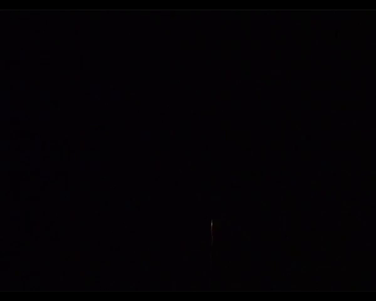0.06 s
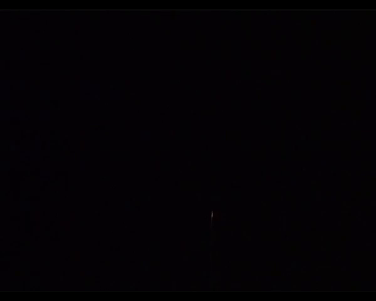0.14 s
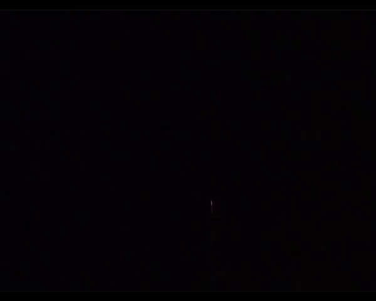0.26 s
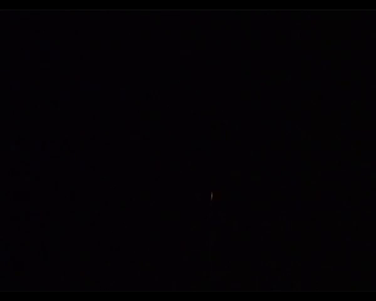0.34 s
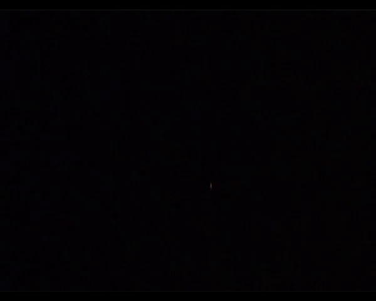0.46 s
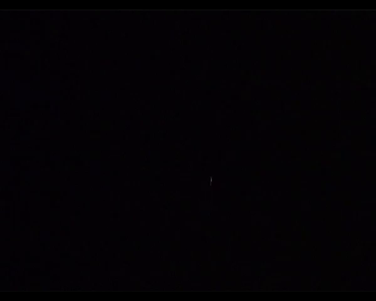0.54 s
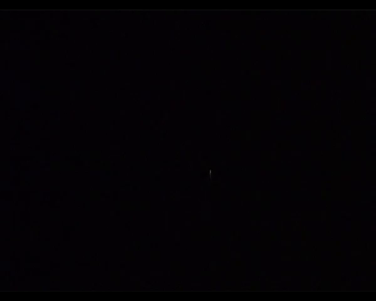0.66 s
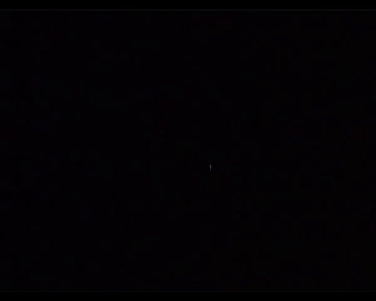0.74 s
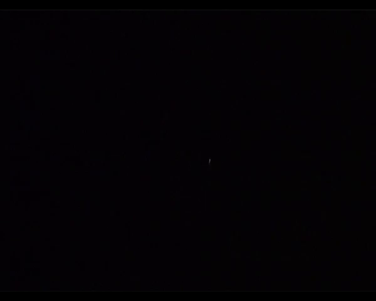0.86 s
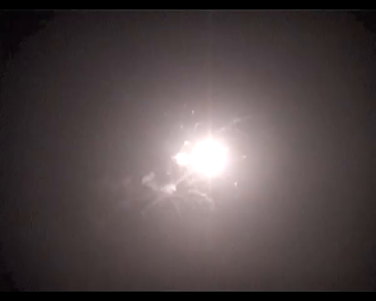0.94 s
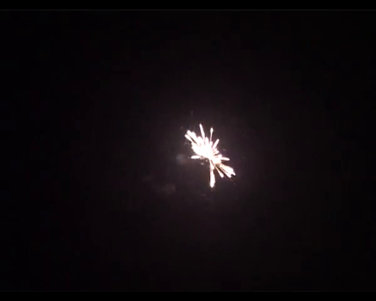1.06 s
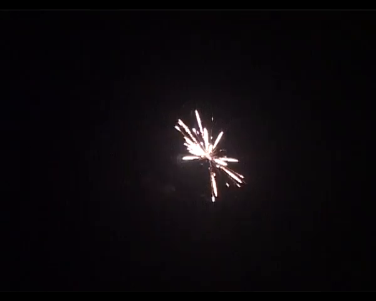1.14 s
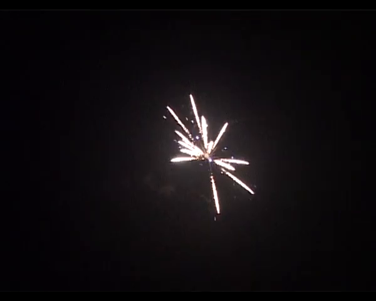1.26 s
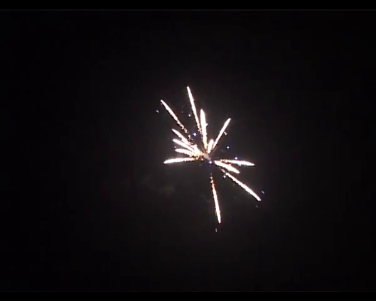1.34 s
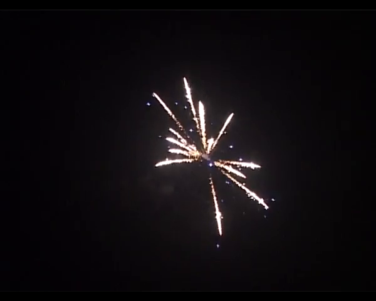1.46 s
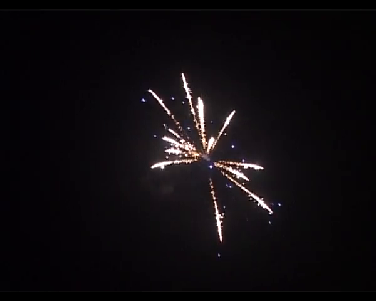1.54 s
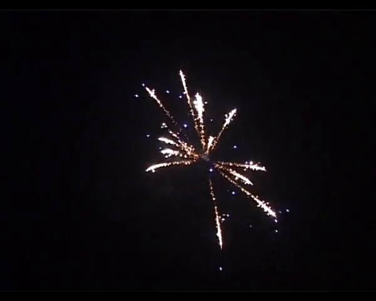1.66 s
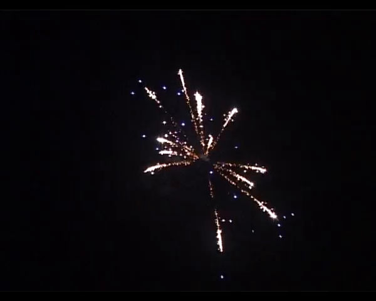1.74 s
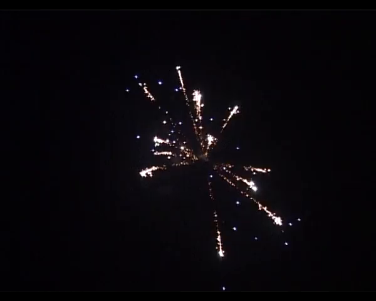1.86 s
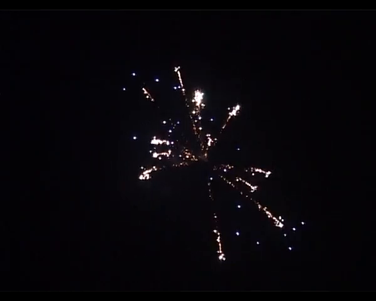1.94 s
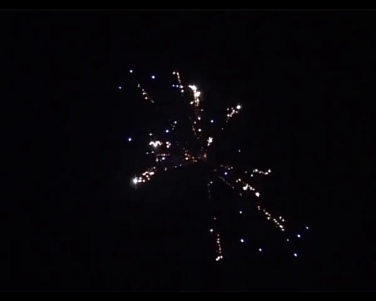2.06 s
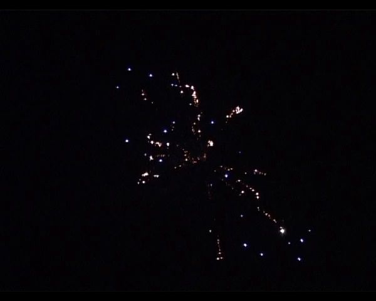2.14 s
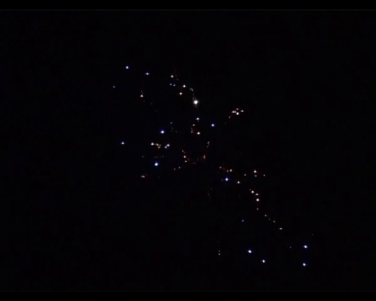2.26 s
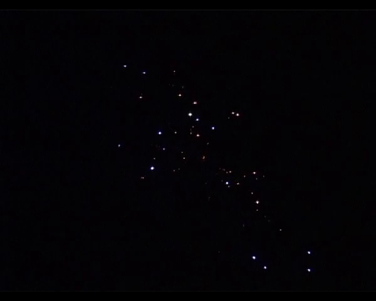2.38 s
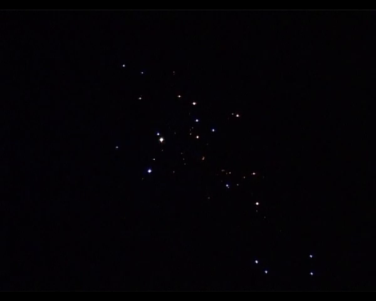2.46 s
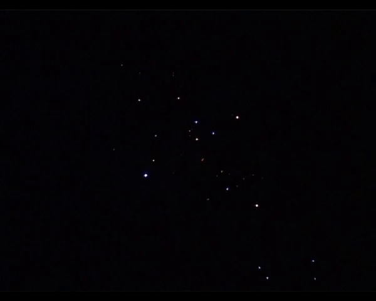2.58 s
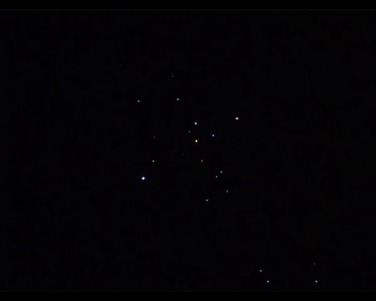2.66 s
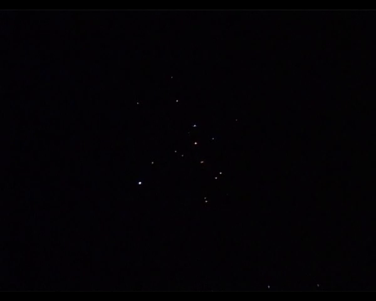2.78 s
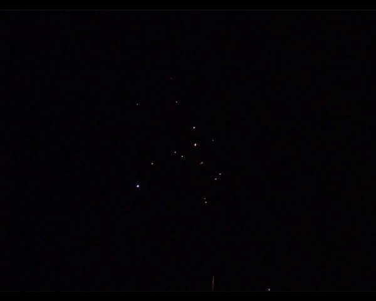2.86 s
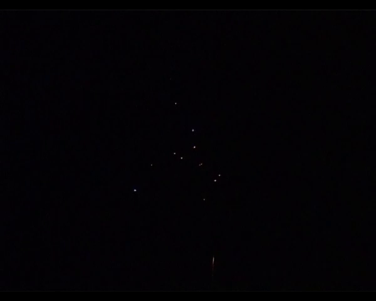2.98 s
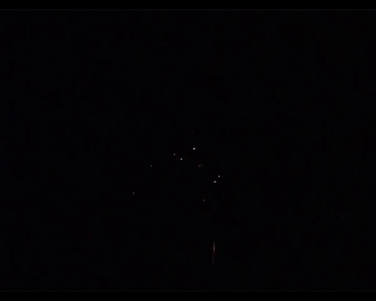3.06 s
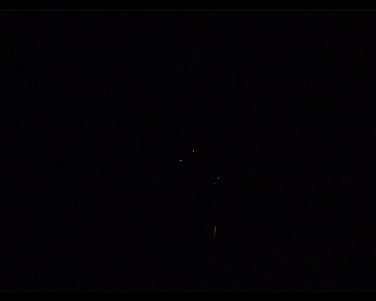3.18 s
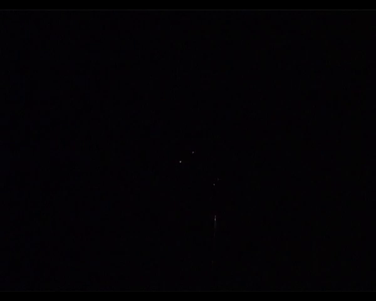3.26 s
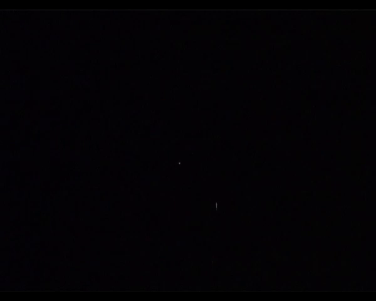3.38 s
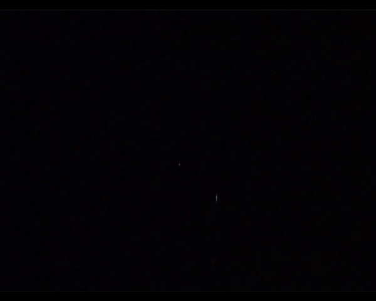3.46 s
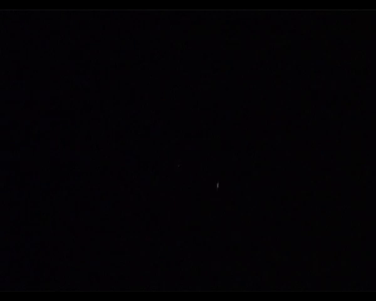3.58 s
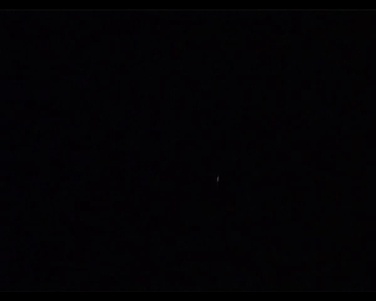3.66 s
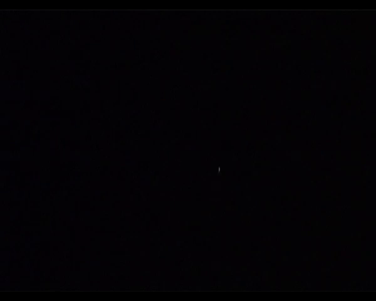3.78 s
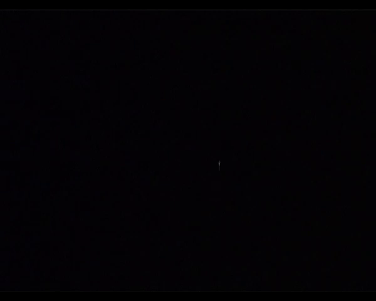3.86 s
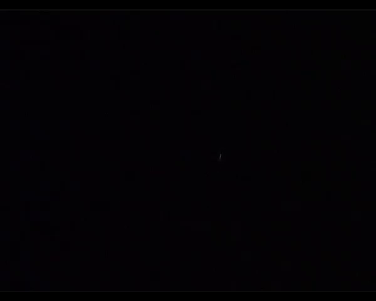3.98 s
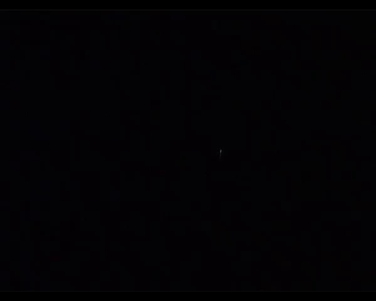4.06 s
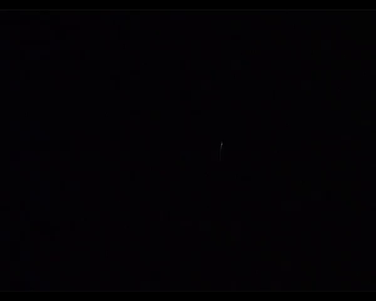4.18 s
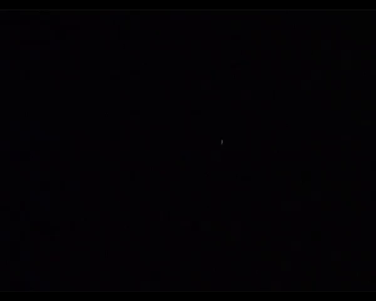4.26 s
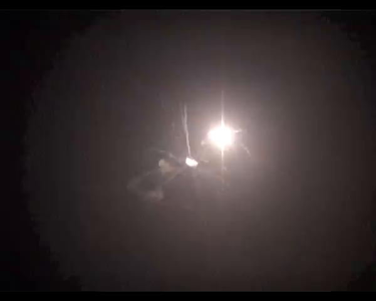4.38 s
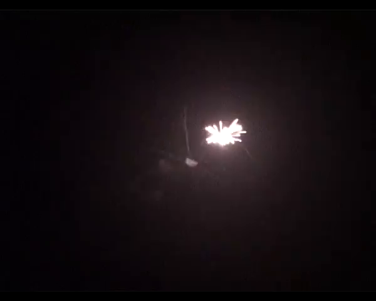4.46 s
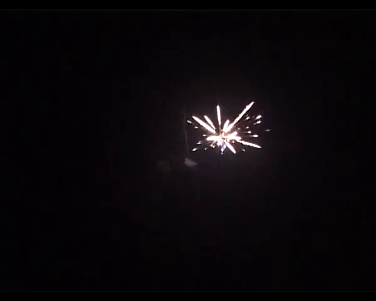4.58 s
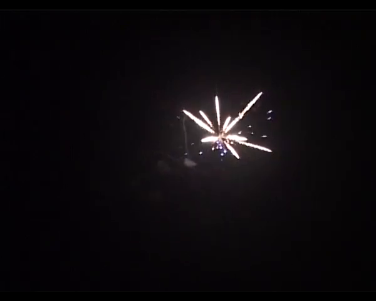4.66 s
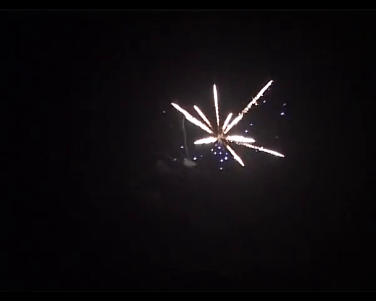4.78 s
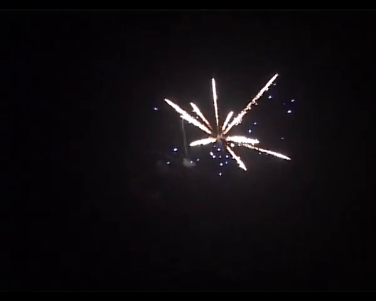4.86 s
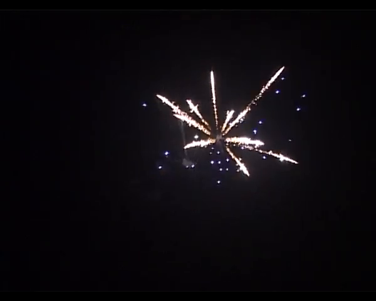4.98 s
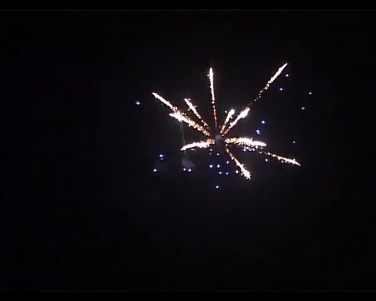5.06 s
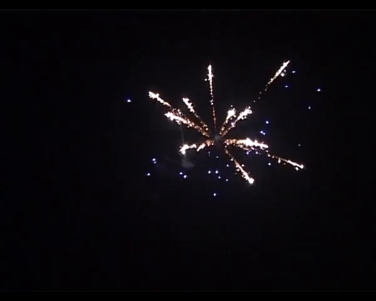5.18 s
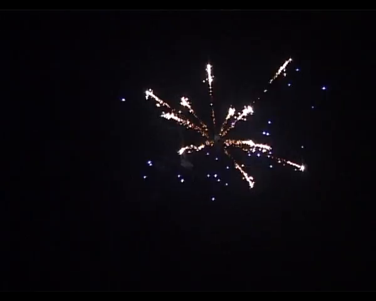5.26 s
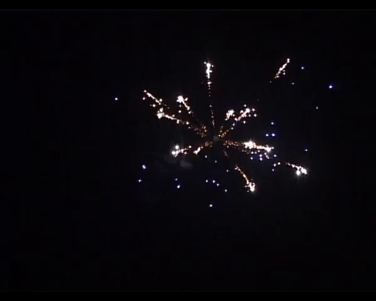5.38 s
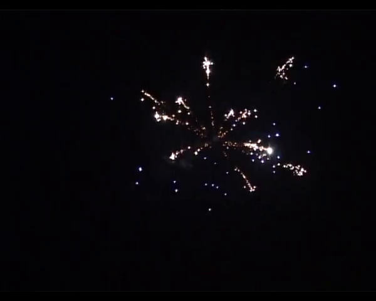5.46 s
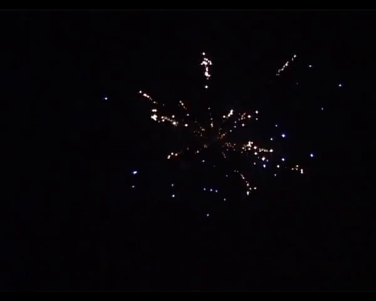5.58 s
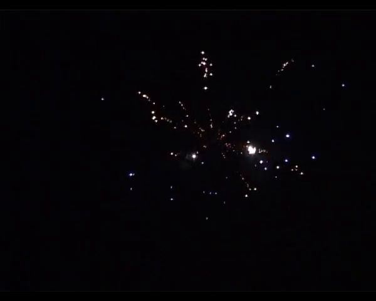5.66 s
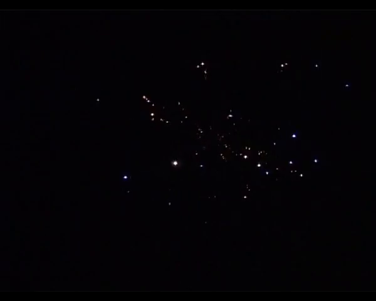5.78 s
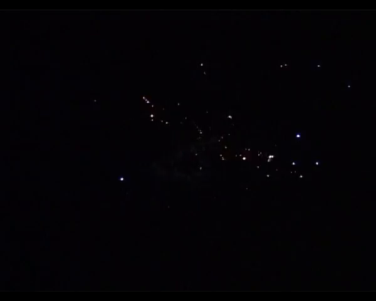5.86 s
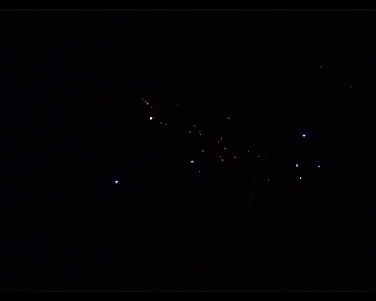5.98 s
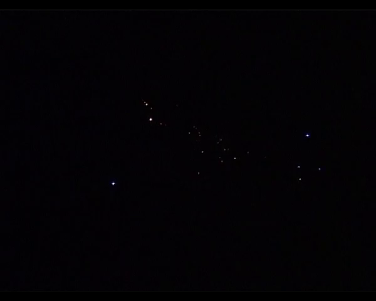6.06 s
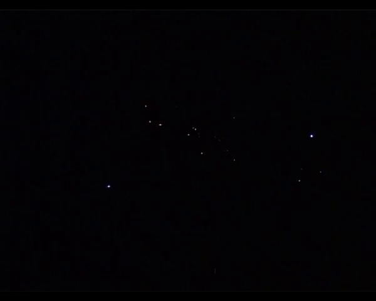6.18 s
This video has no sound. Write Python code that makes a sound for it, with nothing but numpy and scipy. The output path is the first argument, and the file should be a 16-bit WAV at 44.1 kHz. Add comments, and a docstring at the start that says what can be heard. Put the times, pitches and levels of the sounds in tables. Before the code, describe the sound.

Outdoors at night, a faint sputtering hiss climbs, then a huge firework bang cracks and rolls across the land. Half a second later its stars crackle densely and thin out to lone snaps. A launch thump slaps back, another shell hisses upward, and the bang and crackle repeat before a last launch. Quiet crickets, bat chirps and distant thuds fill the gaps. Stereo microphones stand fairly close and overload on the loud shocks.

```python
"""Outdoors at night, a firework cake fires: shells thump out of their tubes, climb and burst into crackling stars.
Shock waves are N-shaped pressure pulses with ground bounce, smeared echoes and decaying noise from the land.
Stars are random pulses, each a push and a suction; the climbing tracers are sputtering coloured noise.
Distant thuds are bands of decaying noise; crickets and a bat are gliding tones with a foliage echo.
Coloured noise and a wavering hum make a steady background; loud shocks overload the stereo microphones."""
import sys
import numpy as np
from scipy import signal
from scipy.fft import rfft, irfft
from scipy.io import wavfile

SR = 44100
rng = np.random.default_rng(int(sys.argv[2]) if len(sys.argv) > 2 else 0)


def output_pcm(signal):
    """Save a mono or channel-first signal as 16-bit PCM at the path in sys.argv[1].

    Samples are clipped to [-1, 1] before scaling.
    """
    pcm = np.clip(np.atleast_2d(signal).T, -1, 1) * 32767
    wavfile.write(sys.argv[1], SR, np.round(pcm).astype(np.int16))


N = 274743
T = np.arange(N) / SR  # time [s]
SIZE = 8192  # length of short sounds and filter spectra [samples]


# Shell bursts; levels are relative, before filtering: (time [s], shock level [dB], shock length [ms],
# ground bounce lag [ms], echo level [dB], echo path length [ratio], crackle onset after burst [s],
# burn-out after burst [s], crackle level [dB])
BURSTS = [(1.3067, 3.5, 1.9, 4.6, -.7, 1, .485, 1.01, -37.4),
          (4.7607, 4.3, 1.88, 4.9, -.3, 1.035, .46, 1.055, -37.7)]
# Echoes from houses and trees: (lag [s], relative level [dB], smear [s], treble edge [Hz])
BURST_ECHOES = [(.009, -8, .024, 5000), (.061, -9.5, 0.018, 4000), (.082, -12.5, 0.0072, 6100),
                (.163, -8, 0.012, 1040), (0.275, -14, 0.037, 700)]
# Diffuse echo of the land after a burst: (frequency [Hz], relative level [dB per Hz], T60 [s])
BURST_ROLL = [(39.2, -17, 1.7), (90, -8.5, 1.8), (145, -11, 1.7), (224, .8, 1.7), (430, 2, 1.74),
              (700, -2.5, 1.55), (1030, -1.3, 1.46), (1560, -13, 1.8), (2900, -15.5, 1.48),
              (6150, -20.5, 1.06), (8400, -33, 0.89), (11440, -37, 1.3), (13000, -57.5, 1)]
WHUMP_DB = -22  # relative to the shock


def bursts():
    """Shock radiation and reflection: a direct N-wave, a ground bounce, smeared echoes and a long roll."""
    out = np.zeros((2, N))
    for s, db, ms, bounce_ms, echo_db, path, *_ in BURSTS:
        n_wave = shock(ms, cut_hz=279, ring=1.15, low_hz=195)
        wave = undb(db) * edge(n_wave, 5000, "low", order=1)
        # things close to the microphone roughen the crack
        roughness = edge(smear(wave, length_s=.004), 600, "high", order=1)
        near = wave + undb(-7) * roughness
        add(out, s, near)
        add(out, s, whump(db + WHUMP_DB))
        bounce = undb(2.0) * edge(near, 5000, "low", order=1)
        add(out, s + bounce_ms / 1000, bounce)
        for lag, gain_db, length_s, top_hz in BURST_ECHOES:
            echo = edge(smear(wave, length_s), top_hz, "low", order=1)
            add(out, s + lag * path, undb(gain_db + echo_db + 0.5) * echo)
        add(out, s, undb(echo_db - 6) * roll(BURST_ROLL, rise_s=.01, side_db=-29.5))
    return out


# Lift charges; levels are relative, before filtering:
# (time [s], level [dB], shock length [ms], diffuse echo level [dB])
LIFTS = [(2.6049, 2.2, 2.5, 3.5), (5.8831, 1.8, 2.52, 4.7)]
# Resonances of the launch tube: (frequency [Hz], level [dB], T60 [s])
TUBE = [(250, -10.7, 0.07), (495, -17, 0.029), (645, -22.5, 0.03), (930, -8.6, 0.027)]
# Direct path, then walls: (lag [s], boom level [dB], boom treble edge [Hz], crack level [dB], crack smear [s])
LIFT_PATHS = [(0, 1, 1400, -1, 0.006), (0.023, -20, 1000, -15, 0.005), (0.1157, -19, 1000, -5, 0.0028),
              (.1246, -11.5, 700, -6, .005), (.164, -24, 700, -15, 0.036)]
# Spectrum of the crack: (frequency [Hz], relative level [dB per Hz])
CRACK_COLOUR = [(300, -1), (900, 2.5), (2000, -0.5), (4300, 0.5), (6200, -9.5), (8500, -22), (11000, -27),
                (13000, -46)]
# Diffuse echo of the land after a lift: (frequency [Hz], relative level [dB per Hz], T60 [s])
LIFT_ROLL = [(40, -2, 0.33), (95, 0, 1.2), (145, -7.5, 1.5), (242, 5.5, 1.1), (400, -6.5, 1.9),
             (700, -9.5, 1.7), (950, -13, 4.4), (1480, -18, 3), (3000, -19, 1.9), (6040, -27, 1.3),
             (8200, -34, 0.23), (12500, -60, .6)]
LIFT_WHUMP_DB = -30


def lifts():
    """Tube resonance and rough-wall reflection: each lift charge cracks, booms and slaps back."""
    out = np.zeros((2, N))
    t = T[:SIZE]
    tube = np.zeros(SIZE)
    for hz, db, t60 in TUBE:
        # the leaving shell pulls the air out of the tube, so the ring starts with a suction
        tube -= undb(db) * np.sin(2 * np.pi * hz * t) * decay(t, t60)
    tube = edge(tube, 90, "high", order=1)
    click = signal.unit_impulse(SIZE)
    for s, db, ms, echo_db in LIFTS:
        boom = shock(ms, cut_hz=365, ring=1.48, low_hz=289) + tube + whump(LIFT_WHUMP_DB)
        for lag, boom_db, top_hz, crack_db, length_s in LIFT_PATHS:
            # the rougher the path, the less is left of the clean click
            clean = undb(-4) * np.exp(-length_s / .012)
            crack = colour(clean * click + undb(-7) * smear(click, length_s), CRACK_COLOUR)
            arrival = undb(db + boom_db) * edge(boom, top_hz, "low") + undb(db + crack_db) * crack
            add(out, s + lag, arrival)
        add(out, s, undb(echo_db - 20.5) * roll(LIFT_ROLL, rise_s=.004, side_db=-22))
    return out


# Spectrum of the stars: (frequency [Hz], relative level [dB per Hz])
STAR_COLOUR = [(88, -63), (150, -33), (185, -2), (314, 4), (635, -.5), (964, 1), (1550, -1.5), (1870, 0),
               (4400, 0.5), (5320, -3.5), (6190, -1.5), (7000, -10), (8600, -17.5), (9600, -13.5),
               (10400, -17), (11300, -14), (12700, -33), (14000, -72.5)]
# Loud lone stars: (time [s], pulse level before suction and colouring [dB])
POPS = [(2.2385, -11), (2.3595, -17), (2.3755, -15.5), (2.3925, -16.5), (2.4064, -17), (2.4093, -11),
        (2.436, -20), (2.475, -22), (2.4795, -20), (2.491, -18), (2.5125, -18.5), (2.5278, -21),
        (2.5448, -17.5), (2.5497, -19.5), (2.924, -28), (5.7803, -10.5), (5.8715, -14), (5.907, -15),
        (5.9205, -15), (5.961, -11.5), (5.977, -16), (6.0155, -19), (6.0435, -16), (6.0935, -22.5),
        (6.1462, -20.5)]
STAR_FUSE_SPREAD_S, STAR_LIFE_SPREAD_S = .04, .034  # how unevenly the stars start and burn out
STAR_SWELL_DB_PER_S = 3  # the snaps grow as the stars burn down
SNAPS_PER_S = 2200  # at the height of the crackle
POP_BOUNCE_S, POP_BOUNCE_DB = .005, -9  # the ground repeats each lone snap
WASH_DB, WASH_S, WASH_TOP_HZ = -3, .16, 750  # level, decay time constant and treble edge


def crackle(gain_db=7):
    """Random pulse process: after each burst, stars wait, sizzle by the hundred, then thin out."""
    clicks = np.zeros(N)
    for s, *_, fuse_s, life_s, db in BURSTS:
        started = step(s + fuse_s, STAR_FUSE_SPREAD_S)
        burnt_out = step(s + life_s, STAR_LIFE_SPREAD_S)
        active = started * (1 - burnt_out) * (T > s)
        clumps = unit(undb(1.6 * walk(N, 130))) ** 2
        # many snaps are small, few are large; the first and last are both sparser and softer
        sizes = unit(np.abs(rng.standard_normal(N)))
        fires = rng.random(N) < SNAPS_PER_S / SR * active ** (2 / 3) * clumps
        snaps = fires * sizes * active ** (1 / 6)
        swell_db = STAR_SWELL_DB_PER_S * np.minimum(T - s - life_s, 0)
        # allow for the pulse density and the energy of the colour filter
        scale = np.sqrt(SR / SNAPS_PER_S) / np.linalg.norm(response(STAR_COLOUR))
        clicks += snaps * undb(db + swell_db + gain_db) * scale
    for s, db in POPS:
        add(clicks, s, undb([db]))
        add(clicks, s + POP_BOUNCE_S, undb([db + POP_BOUNCE_DB]))
    clicks = suction(clicks)
    # each star has its own place in the sky
    side = undb(-22) * edge(clicks * rng.standard_normal(N), 3000, "high", order=1)
    # grass and leaves scatter a short, soft tail after every snap
    tail = undb(-14.5) * edge(smear(clicks, length_s=0.059), 7000, "low", order=1)
    # the land gives the crackle back, late and dull
    land = rng.standard_normal(SR) * np.exp(-T[:SR] / WASH_S)
    returned = signal.oaconvolve(clicks, land / np.linalg.norm(land))[:N]
    wash = undb(WASH_DB) * edge(returned, WASH_TOP_HZ, "low")
    return colour(clicks + side * np.array([[1], [-1]]) + tail + wash, STAR_COLOUR)


# Climbing shells: (launch [s], hiss level at launch [dB], last flare [s], flare level [dB])
CLIMBS = [(-.85, -50.5, .29, -58.8), (2.62, -49.5, 3.52, -57.5)]
# Spectrum of the hiss: (frequency [Hz], relative level [dB per Hz])
TRACER_COLOUR = [(150, -5.5), (350, 7.5), (700, 3), (1000, 4.5), (1500, 1), (3000, -5.5), (4500, -14),
                 (7000, -29), (12000, -55)]
CLIMB_FADE_DB_PER_S = 14  # the hiss recedes with height
FLARE_ATTACK_S, FLARE_HOLD_S, FLARE_RELEASE_S = .06, .16, .085  # the release is a time constant
SPUTTER_DB, SPUTTER_PER_S = 2.2, 90  # depth and rate of the random level wander


def tracer():
    """Amplitude-modulated noise: the hiss sputters and fades with height, flares once and goes out."""
    gain = np.zeros(N)
    for launch_s, db, flare_s, flare_db in CLIMBS:
        climb_db = db - CLIMB_FADE_DB_PER_S * np.maximum(T - launch_s, 0)
        climb = undb(climb_db) * (T > launch_s)
        flaring = np.clip(1 + (T - flare_s) / FLARE_ATTACK_S, 0, 1)
        burning = np.exp(-np.maximum(T - flare_s - FLARE_HOLD_S, 0) / FLARE_RELEASE_S)
        gain += (climb * (1 - flaring) + undb(flare_db) * flaring) * burning
    sputter = undb(SPUTTER_DB * walk(N, SPUTTER_PER_S))
    return gain * sputter * unit(colour(air(N, side_db=-28), TRACER_COLOUR))


# Faint thuds far off: (time [s], level before decay [dB], centre frequency [Hz], T60 [s])
THUDS = [(.312, -50, 600, 0.058), (.575, -62, 300, .2), (.91, -61, 328, .35), (2.485, -43, 350, .25),
         (3.956, -53.5, 406, 0.3), (3.959, -56.5, 99, 0.58), (4.042, -44, 220, 0.14),
         (4.068, -52, 100, 0.35), (4.16, -59, 450, 0.37)]


def thuds():
    """Band-limited noise decay: dull knocks from far away, each about an octave wide."""
    out = np.zeros((2, N))
    for s, db, hz, t60 in THUDS:
        below = edge(air(SR, side_db=-37), hz * np.sqrt(2), "low", order=3)
        body = unit(edge(below, hz / np.sqrt(2), "high"))
        add(out, s, undb(db) * body * decay(T[:SR], t60))
    return out


# Cricket voices: name: (stroke rate [per s], nominal stroke level [dB], mid-stroke pitch [Hz],
# fall within a stroke [share], foliage echo [dB])
CRICKETS = {"near": (22.3, -45.6, 4330, .033, -17), "raspy": (19, -66, 3750, .22, -6),
            "far": (24, -73.3, 2544, .1, -8), "quick": (47, -70.5, 2334, .13, -8)}
# Trills: (cricket [name], first stroke [s], last stroke [s], effort [dB])
TRILLS = [("far", .03, 6.2, 0), ("raspy", .273, .45, -1), ("raspy", .693, .795, 2),
          ("near", .939, 1.287, -2.5), ("raspy", 1.078, 1.185, 0), ("near", 2.524, 2.845, 0),
          ("near", 3.14, 3.461, 0), ("near", 3.773, 3.773, 0), ("near", 3.862, 4.139, .5),
          ("near", 4.376, 4.607, .5), ("quick", 4.42, 4.74, 0), ("near", 5.95, 6.183, -4)]
WARM_UP_STROKES, COLD_DB, COLD_FLAT = 2.6, -6, .028  # a trill starts softer and flatter (share of pitch)


def crickets(duty=.52):
    """Stridulation: each wing stroke rings a falling note; a trill starts low, short and soft, then settles."""
    voices = {name: np.zeros(N) for name in CRICKETS}
    for name, first, last, effort_db in TRILLS:
        rate, db, hz, fall, _ = CRICKETS[name]
        strokes = np.linspace(first, last, round((last - first) * rate) + 1)
        for k, s in enumerate(strokes):
            cold = np.exp(-k / WARM_UP_STROKES)
            pitch = hz * (1 + fall / 2 - COLD_FLAT * cold + .003 * rng.standard_normal())
            force_db = db + effort_db + COLD_DB * cold + 1.2 * rng.standard_normal()
            note = chirp(duty / rate * (1 - .25 * cold), pitch, fall)
            add(voices[name], s, undb(force_db) * note)
    out = 0
    for name, voice in voices.items():
        # a hard surface nearby repeats each stroke once
        add(voice, .016, undb(-11) * voice)
        out = out + among_trees(voice, wet_db=CRICKETS[name][-1], t60=.4)
    return out


# Bat calls: (time [s], level before decay [dB])
BAT = [(.068, -56), (.099, -55), (.890, -41.5), (1.95, -43.5), (2.889, -43.5), (3.549, -58.5), (3.596, -52),
       (3.625, -52), (4.164, -44), (4.37, -58), (5.152, -45.5), (5.893, -45)]
BAT_HZ = 13100  # where each sweep starts


def bat():
    """Frequency-modulated calls: steep falling sweeps at the top of hearing."""
    out = np.zeros(N)
    for s, db in BAT:
        call = chirp(0.018, BAT_HZ, fall=0.24)
        add(out, s, undb(db) * call * np.exp(-T[:len(call)] / 0.019))
    return among_trees(out, wet_db=-6.5, t60=0.15)


# Spectrum of the steady background noise: (frequency [Hz], relative level [dB per Hz])
BACKGROUND_COLOUR = [(25, -11), (55, -1), (85, -1), (140, -9), (230, 1.5), (400, -6), (700, -9),
                     (1000, -5.5), (1400, -16), (2200, -20.5), (3200, -25.5), (4400, -21.5), (5800, -28.5),
                     (7600, -20), (9500, -40), (11000, -52)]
BACKGROUND_DB = -64.3  # rms level, before its slow wander


def background():
    """Coloured noise and frequency modulation: steady background noise with a low, wavering hum."""
    phase = 2 * np.pi * np.cumsum(63 + 0.72 * walk(N, 14)) / SR
    hum = undb(-67.2 + 1.5 * walk(N, 4)) * np.sin(phase)
    level = undb(BACKGROUND_DB + 0.67 * walk(N, 4.8))
    return level * unit(colour(air(N, side_db=-10), BACKGROUND_COLOUR)) + hum


def shock(ms, cut_hz, ring, low_hz):
    """Resonant high-pass response: the microphone's low cut makes an N-shaped pressure wave swing on."""
    wave = np.interp(T[:SIZE] * 1000, [0, ms, ms + .1], [1, -1, 0])
    w = 2 * np.pi * cut_hz
    b, a = signal.bilinear([1, 0, 0], [1, w / ring, w * w], SR)
    return edge(signal.lfilter(b, a, wave), low_hz, "high", order=1)


WHUMP_HZ, WHUMP_S = 86, .011  # pitch and decay time constant


def whump(db):
    """Damped oscillation: expanding gas gives one low, quickly damped swing."""
    t = T[:SIZE]
    return -undb(db) * np.sin(2 * np.pi * WHUMP_HZ * t) * np.exp(-t / WHUMP_S)


def roll(bands, rise_s, side_db):
    """Diffuse reverberation: countless small echoes arrive in clumps; each band decays at its own pace."""
    n = 2 * SR
    t = T[:n]
    hz, db, t60 = np.transpose(bands)
    log_hz = np.log(hz)
    grid = np.log(np.maximum(np.fft.rfftfreq(n, 1 / SR), 1))
    clumps = undb(2.6 * walk(n, 200))
    spectrum = rfft(air(n, side_db) * clumps) * undb(np.interp(grid, log_hz, db))
    out = 0
    for share, life in zip(np.eye(len(hz)), t60):
        # a triangular band around one frequency of the table
        band = irfft(spectrum * np.interp(grid, log_hz, share))
        out = out + band * decay(t, life)
    return out * (1 - np.exp(-t / rise_s))


def smear(x, length_s):
    """Scattering: spread a sound over many small reflections of about the same total energy."""
    facets = air(SIZE, side_db=-9) * np.exp(-T[:SIZE] / length_s)
    facets = facets / np.linalg.norm(facets[0])
    return signal.oaconvolve(np.atleast_2d(x), facets, axes=1)[:, :x.shape[-1]]


SNAP_MS, SNAP_SUCTION = (.1, .9), .45  # range of the lag and share of the suction after each snap


def suction(clicks):
    """Comb interference: each snap pushes, then sucks after its own short lag, so their colours vary."""
    lags = (rng.uniform(*SNAP_MS, N) * SR / 1000).astype(int)
    pulls = np.bincount(np.arange(N) + np.maximum(lags, 0), clicks)[:N]
    return (clicks - SNAP_SUCTION * pulls) / np.hypot(1, SNAP_SUCTION)


def among_trees(x, wet_db, t60):
    """Diffuse scattering: a small voice with the soft echo of foliage."""
    leaves = air(SR, side_db=-16.5) * decay(T[:SR], t60)
    leaves = leaves / np.linalg.norm(leaves[0])
    return x + undb(wet_db) * signal.oaconvolve(x[None], leaves, axes=1)[:, :N]


def chirp(length_s, hz, fall):
    """Frequency glide: one tone starts quickly, slides down and stops."""
    u = np.linspace(0, 1, int(length_s * SR))
    phase = 2 * np.pi * np.cumsum(hz * (1 - fall * u)) / SR
    return 2 * np.sqrt(u * (1 - u)) * np.sin(phase)


def air(n, side_db):
    """Stereo coherence: noise at two close microphones differs mainly in the treble."""
    mid, side = rng.standard_normal((2, n))
    return mid + undb(side_db) * edge(side, 2000, "high", order=1) * np.array([[1], [-1]])


def decay(t, t60):
    """Exponential decay: 60 dB down after t60 seconds."""
    return np.exp(-np.log(1000) * t / t60)


def walk(n, rate):
    """Random modulation: straight lines between normal draws, rate draws a second."""
    return np.interp(np.arange(n) / SR * rate, np.arange(SIZE), rng.standard_normal(SIZE))


def step(s, spread_s):
    """Logistic transition: a soft step from 0 to 1 around time s."""
    return (1 + np.tanh((T - s) / (2 * spread_s))) / 2


def response(points):
    """Minimum phase: a causal impulse response, peak 1, shaped by (frequency [Hz], level [dB]) points."""
    hz, db = np.transpose(points)
    grid = np.maximum(np.fft.rfftfreq(SIZE, 1 / SR), 1)
    cepstrum = irfft(np.log(undb(np.interp(np.log(grid), np.log(hz), db))))
    # keeping only the first half of the cepstrum makes the response causal
    cepstrum[SIZE // 2:] = 0
    h = irfft(np.exp(rfft(2 * cepstrum)))[:SIZE // 4]
    return h / np.abs(h).max()


def colour(x, points):
    """Linear filtering: convolve a stereo sound with the response to (frequency [Hz], level [dB]) points."""
    return signal.oaconvolve(x, response(points)[None], axes=1)[:, :x.shape[1]]


def edge(x, hz, kind, order=2):
    """Butterworth filtering: low-pass or high-pass."""
    return signal.sosfilt(signal.butter(order, min(hz, SR / 2 - 1000), kind, fs=SR, output="sos"), x)


def undb(db):
    """Logarithmic level: decibels to amplitude gain."""
    return 10 ** (np.asarray(db) / 20)


def unit(x):
    """Mean-square normalisation: scale to rms 1."""
    return x / np.sqrt(np.mean(x ** 2))


def add(out, s, x):
    """Superposition: mix x into out from time s on."""
    i = max(int(round(s * SR)), 0)
    n = max(min(x.shape[-1], out.shape[-1] - i), 0)
    out[..., i:i + n] += x[..., :n]


def scene():
    """Superposition: the fireworks over crickets, a bat and the background noise."""
    return bursts() + lifts() + crackle() + tracer() + thuds() + crickets() + bat() + background()


SAG_DB = (-10.5, -24)  # gain of the overload sag in the (left, right) microphone
SAG_SLOW_HZ, SAG_FAST_HZ = 13, 75  # the sag's recovery and onset, as filter edges
TOP_HZ = 13400  # treble limit


def record(dry):
    """Nonlinear overload: shocks are rounded and make the microphones sag, the left most; the top is cut."""
    rounded = dry / (1 + dry ** 4) ** (1 / 4)
    power = edge(dry ** 2, SAG_FAST_HZ, "low")
    sag = edge(power, SAG_SLOW_HZ, "high", order=1)
    heard = edge(rounded, 22, "high", order=1) - undb(SAG_DB)[:, None] * sag
    return signal.sosfilt(signal.ellip(8, .2, 70, TOP_HZ, fs=SR, output="sos"), heard)


dry = scene()
out = record(dry)
output_pcm(out)
```